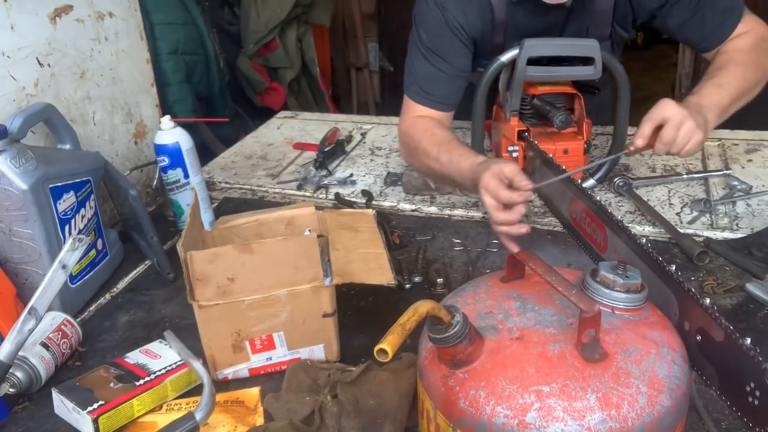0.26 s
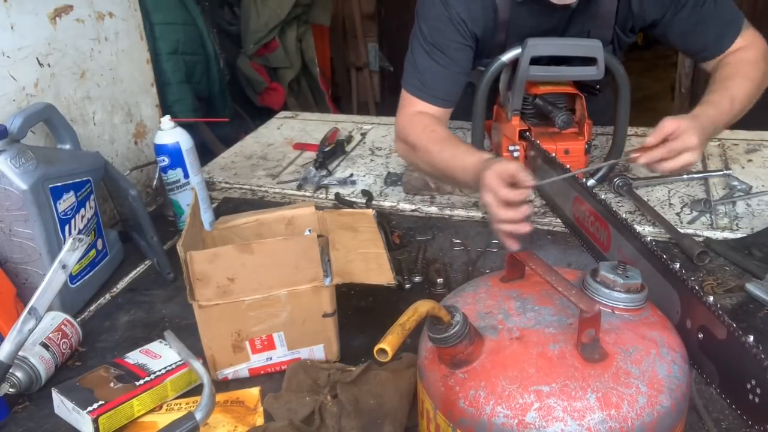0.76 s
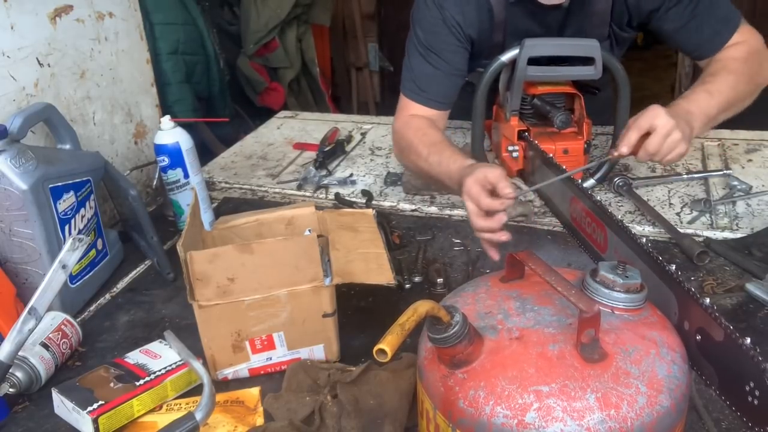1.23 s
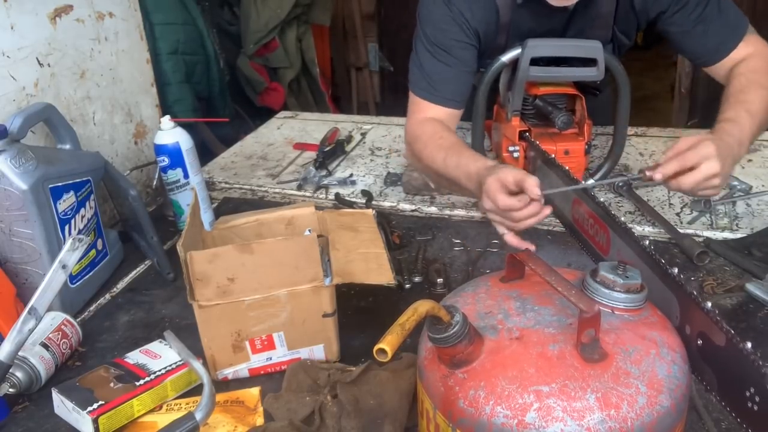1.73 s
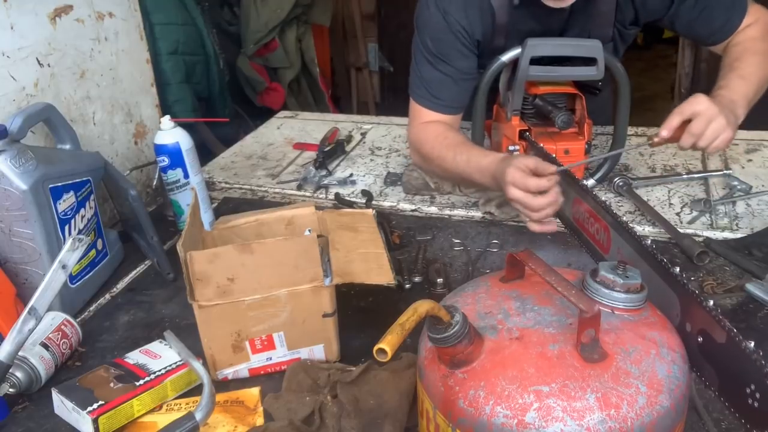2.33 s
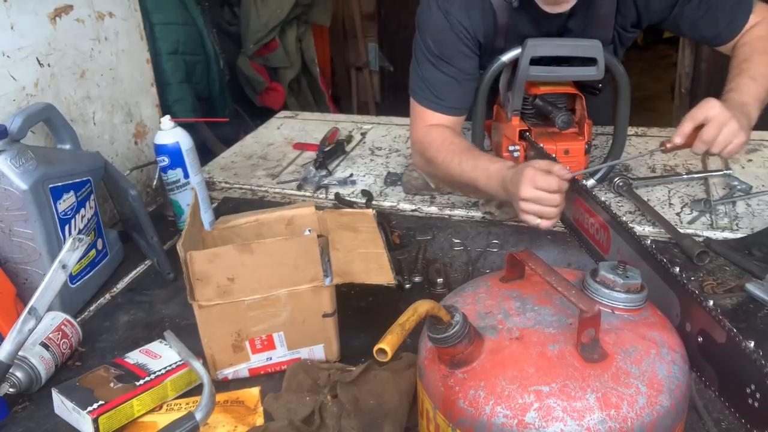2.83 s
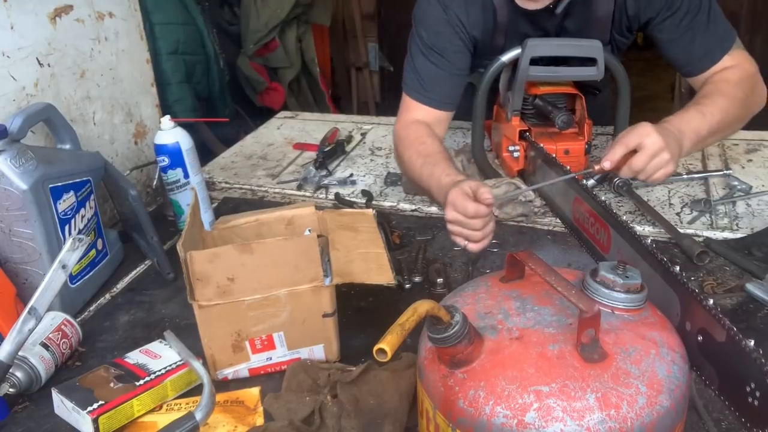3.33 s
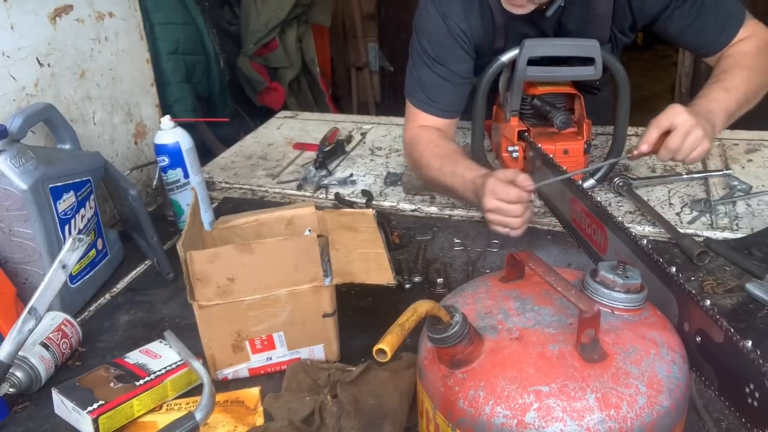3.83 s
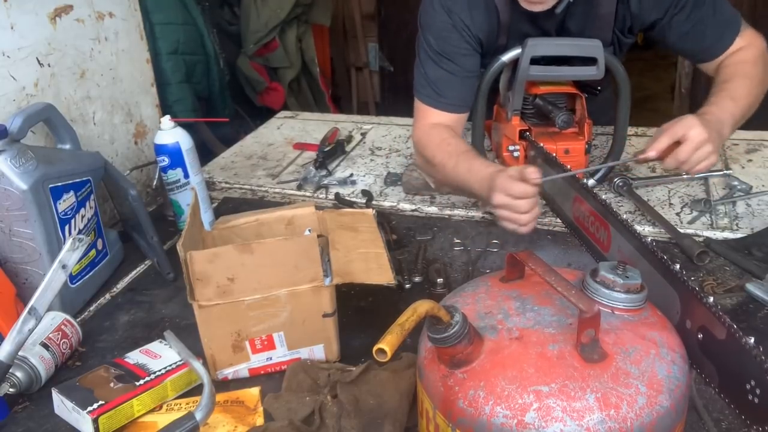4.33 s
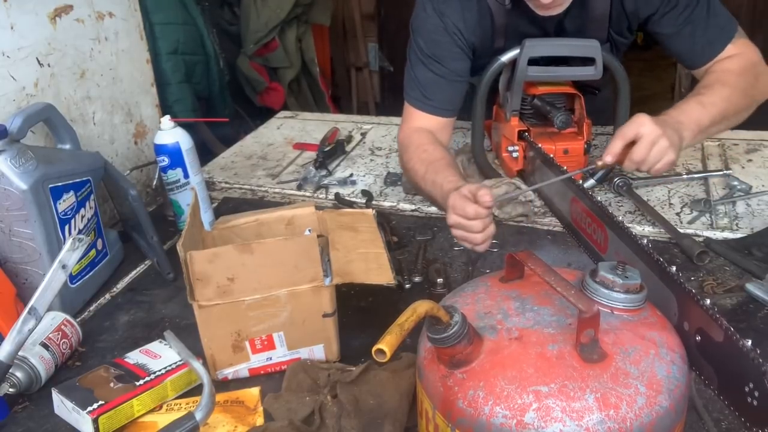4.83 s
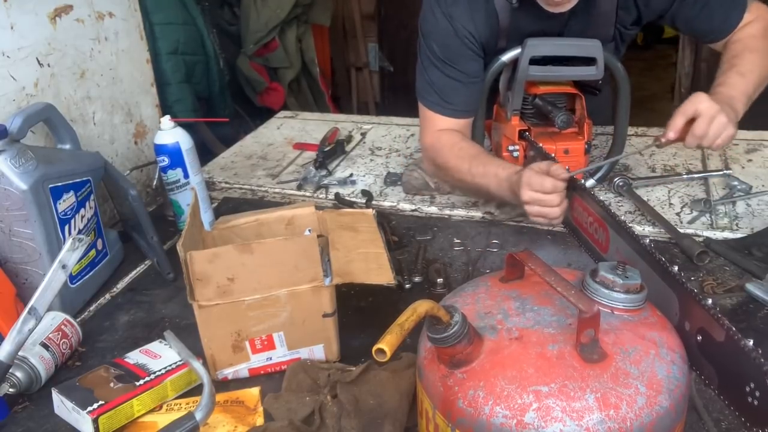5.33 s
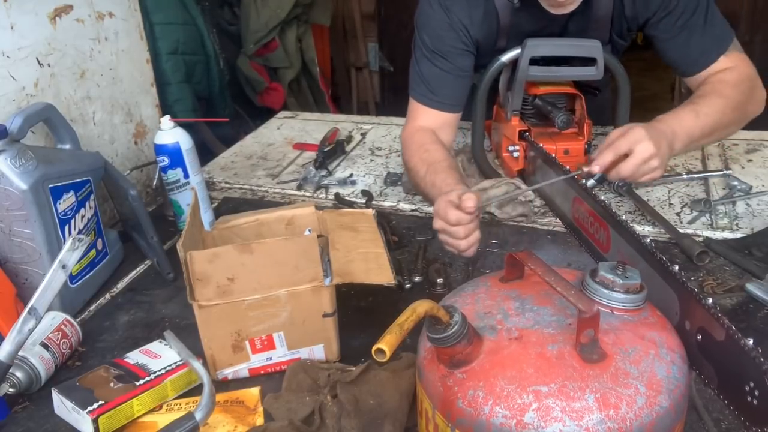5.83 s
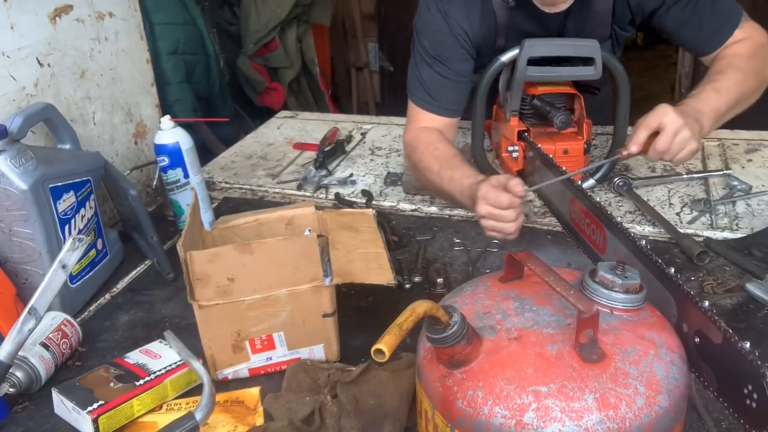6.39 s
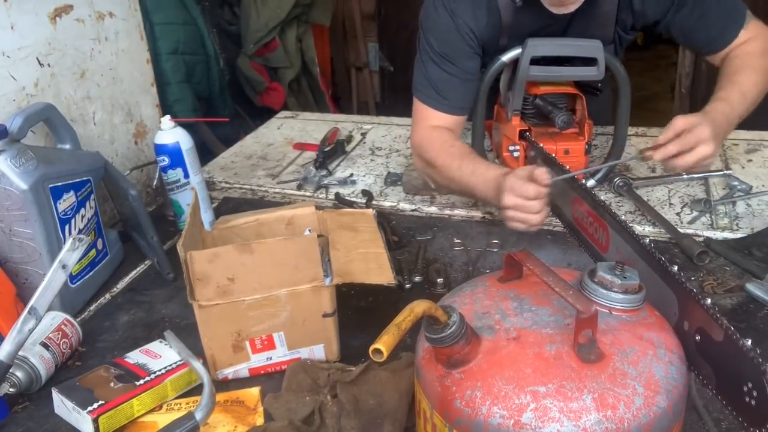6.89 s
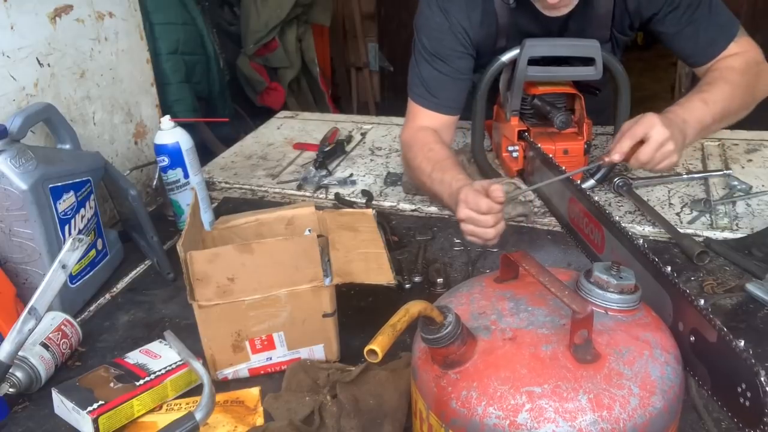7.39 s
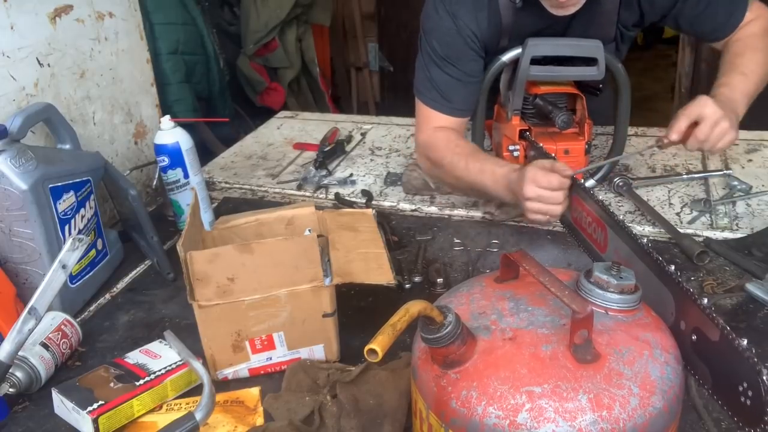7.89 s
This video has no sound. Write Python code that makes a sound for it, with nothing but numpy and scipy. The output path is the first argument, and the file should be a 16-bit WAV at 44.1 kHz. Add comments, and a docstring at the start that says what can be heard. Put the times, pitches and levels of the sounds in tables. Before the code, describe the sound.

A close, fairly dry stereo view of hand filing on a chainsaw chain, slightly right of centre in a small cluttered workshop. Coarse, bright metallic pushes with a low juddering buzz start at 0.05 and 0.9 s, each lasting nearly half a second, with a lighter zipping return at 0.63 s. At about 1.65-1.7 s the file clicks sharply off the cutter with a dull bench knock, brushes lightly, then clicks twice at 2.1 s. After a short scrape and a drawback at 2.55 s, steady pushes follow at 2.8, 3.6, 4.4, 5.2, 6.1, 7.0 and 7.85 s. Thin ringing returns fall between them, with small chirps and squeals, most noticeable near 3.3 s. A single click comes at 4.3 s and a soft low thud at 7.5 s. Faint rumbling air lies beneath; a weak wavering low hum enters around 3.5 s and remains. The last push runs to the end.

```python
"""In a workshop, a round file sharpens the cutters of a chainsaw lying on a bench.
Each push bites: tooth impacts and chip fractures excite the modes of the steel, and friction makes the bar judder.
The file is drawn back lightly, zipping and ringing; snags squeal, and teeth catching in step chirp.
Once it is lifted to the next cutter and set down with clicks, while the saw's body knocks dully on the bench.
Behind lie the room's reflections and still air with a faint rumble; a low wavering hum comes in later."""
import sys
import numpy as np
from scipy import signal
from scipy.fft import rfft, irfft, next_fast_len
from scipy.io import wavfile
from scipy.ndimage import uniform_filter1d

SR = 44100
rng = np.random.default_rng(int(sys.argv[2]) if len(sys.argv) > 2 else 0)


def dump_mix(stems):
    """Bounce the given channels to the path in sys.argv[1] as a 16-bit WAV at rate SR."""
    frames = np.atleast_2d(stems).T  # one column per channel
    limited = np.clip(frames, -1, 1)  # hard clip at full scale
    pcm = np.round(limited * 32767).astype(np.int16)
    wavfile.write(sys.argv[1], SR, pcm)


N = 359415
TIME = np.arange(N) / SR  # s
BINS = np.fft.rfftfreq(8192, 1 / SR)  # Hz

# modes of chain and bar: nominal [f/Hz, width/Hz, lift/dB]
SAW_MODES = [(407, 18, 8.5), (520.7, 40, 9.5), (657, 31, 15.5), (865, 107, 11.5), (3530, 90, -1.5),
             (1411, 270, 7.5), (5810, 84, 4.5), (1857, 94, 4.5), (2413, 83, 7.5), (2620, 118, 8.5),
             (2854, 130, 7), (3036, 190, 7.5), (3207, 171, 9), (3432, 150, 7), (4188, 304, 11)]
# modes of the loosely held file: nominal [f/Hz, width/Hz, lift/dB]
FILE_MODES = [(1593, 380, 6), (4470, 140, 4.8), (5405, 810, 9.4), (6360, 67, 11.4), (11800, 260, 9.5),
              (14700, 700, 12.5)]
# broad colour of the sliding contact: [f/Hz, relative level/dB]
SLIDE_COLOUR = [(60, -22.5), (300, -4), (500, -12), (1200, -8.5), (1600, -8), (3200, -11), (3800, -5.5),
                (6000, -6.5), (7300, -9), (11500, -13), (15500, -23)]
# the sliding file snags, rasps louder and squeals: [middle t/s, half length/s, lift/dB, squeal f/Hz]
SNAGS = [(0.677, 0.029, 3.5, 5500), (1.852, 0.011, 3, 4300), (3.329, .018, 6, 5484),
         (3.359, 0.0069, 6.5, 4220), (3.446, 0.013, 3.5, 5400), (4.342, 0.021, 6, 2793),
         (5.947, 0.024, 2.5, 5600), (6.781, .02, 2, 4330), (7.689, .025, 2.5, 4246)]

# the hand: time to make contact, to brake, and to travel on after lifting (s)
TOUCH_S, BRAKE_S, RUN_ON_S = 0.0072, 0.075, 0.052


def amp(db):
    """Decibels to amplitude ratio: 20 dB per factor of ten."""
    return np.exp(np.asarray(db) * (np.log(10) / 20))


def unit(x):
    """Normalises a signal to rms 1, its effective value."""
    return x / np.sqrt(np.mean(x ** 2) + 1e-20)


def read(points, hz):
    """Interpolates a table on a logarithmic frequency axis, as spectra are plotted."""
    f, value = np.transpose(points)
    return np.interp(np.log(hz + 1), np.log(f + 1), value)


def wobble(hz):
    """Gaussian low-pass noise of rms 1: random fluctuation mostly slower than hz."""
    size = next_fast_len(N // 8 + 2)  # computed at an eighth of the sample rate
    lowpass = np.exp(-(np.fft.rfftfreq(size, 8 / SR) / hz) ** 2)
    slow = irfft(rfft(rng.standard_normal(size)) * lowpass, size)
    return unit(np.interp(np.arange(N) / 8, np.arange(size), slow))


def bump(s, half_s):
    """Gaussian envelope: a smooth swell around the time s."""
    return np.exp(-np.minimum(((TIME - s) / half_s) ** 2, 20))


def causal(gain):
    """Minimum-phase spectrum: the Hilbert transform of log gain gives a response that rings after the blow."""
    log_gain = np.log(np.r_[gain, gain[-2:0:-1]] + 1e-6)
    return np.exp(np.conj(signal.hilbert(log_gain)))[:len(gain)]


def ports(mid, side):
    """Interaural phase: a quadrature side part makes the right channel lead the left."""
    turn = 1j * side / mid
    delay = np.exp(-2j * np.pi * BINS * 32 / SR)
    return irfft(causal(mid) * np.array([1 - turn, 1 + turn]) * delay)[:, :4096]


def through(x, response):
    """Convolution: a linear system answers each sample of x with its left and right impulse responses."""
    return signal.oaconvolve(np.atleast_2d(x), response, axes=1)[:, :N]


def pushes(rasp_db=-0.5, tooth_share=0.62, grab_db=0.87, uneven_db=0.82, settle_s=0.053, brush_judder_db=-6):
    """Stick-slip cutting: the bar's shaking modulates the force on the steel and settles after each stroke."""
    # forward strokes: [start t/s, length/s, rasp level/dB before rasp_db, leaning in/dB,
    # easing off by the end/dB, judder level/dB, where the judder peaks/share of length]
    push_rows = [(0.052, 0.44, -38, 10, 4.5, -32.5, 0.64), (0.91, 0.46, -38, 9.5, 4.5, -33, 0.96),
                 (2.791, 0.42, -34.5, 9.5, 13.5, -32.5, 0.74), (3.575, 0.46, -35.5, 14.5, 9, -32, 0.82),
                 (4.411, 0.42, -37, 4.5, 7, -32, 0.66), (5.241, 0.44, -36.5, 10, 4.5, -31, 0.66),
                 (6.096, 0.49, -36.5, 8, 11, -32, 0.81), (6.978, 0.48, -37.5, 6, 8.5, -33, 0.44),
                 (7.854, 0.39, -37.5, 9, 3, -34.5, 0.6)]
    # the file brushes the cutter while finding its seat: [start t/s, length/s, rasp level/dB before rasp_db]
    brush_rows = [(1.7, 0.19, -43), (1.94, 0.012, -55), (2.215, 0.025, -51.5), (3.286, 0.017, -44),
                  (5.804, 0.042, -51.5), (5.853, 0.028, -44), (6.699, 0.024, -47)]
    # the bar lurches as the file grabs: [t/s, lift/dB]
    lurch_rows = [(.11, 5.5), (1.31, 4.5), (3.98, 4), (4.69, 5), (6.61, 3)]
    # broad colour of the biting contact: [f/Hz, relative level/dB]
    bite_colour = [(150, -24.5), (300, -0.5), (500, -10), (1200, -7.5), (1600, -4), (3200, -8), (6000, -5),
                   (7300, -10), (11500, -14.5), (15500, -17.5)]
    bite_peak_share, lift_db_per_s = 0.38, 274.5
    judder_build_db, judder_ease_db = 11.5, 12.5

    shake, bite = judder(), sliding(brush_rows)
    drive = amp(brush_judder_db) * bite
    for start, length, db, lean_db, ease_db, bar_db, bar_peak in push_rows:
        # the bite is hardest early, the judder builds up later
        bite = bite + stroke(start, length, db, lean_db, bite_peak_share, ease_db, lift_db_per_s)
        drive = drive + stroke(start, length, bar_db, judder_build_db, bar_peak, judder_ease_db, lift_db_per_s)

    cut = tooth_share * teeth(push_rows, top_hz=1196, speed_up_s=0.04, jitter=0.08)
    cut = cut + chips(per_s=6000, spread_db=2.5)
    pressure = amp(grab_db * shake.mean(0) + uneven_db * wobble(37))
    force = unit(cut * pressure) * bite

    # the swing follows its drive at once and dies away exponentially
    fade = np.exp(-1 / (settle_s * SR))
    swing = np.maximum(drive, signal.lfilter([1 - fade], [1, -fade], drive))
    lurch = amp(sum(db * bump(s, half_s=0.025) for s, db in lurch_rows))
    return amp(rasp_db) * rubbed(force, bite_colour, SAW_MODES) + shake * swing * lurch


def judder(grip_detune=0.035):
    """Friction-driven resonance: close low modes of the saw beat together and wander with the grip."""
    # low modes of the saw on the bench: nominal [f/Hz, half width/Hz, relative level/dB]
    low_modes = [(49, 10, -14.5), (100, 16, -0.5), (125.6, 8.7, 4), (195, 10.2, -2.5), (217.5, 12.6, -3.5),
                 (276, 44, -23)]
    body = np.sqrt(sum((amp(db) / (1 + ((BINS - hz) / width) ** 2)) ** 2 for hz, width, db in low_modes))
    spread = amp(read([(100, -58), (210, -13.0), (330, 8.0)], BINS))  # side over mid, against Hz
    shake = through(rng.standard_normal(N), ports(body, body * spread))
    drift = np.cumsum(grip_detune * wobble(8.0)) / SR  # s
    shake = np.array([np.interp((TIME + drift) % TIME[-1], TIME, channel) for channel in shake])
    # the hands damp large swings, so the shaking keeps a steady size
    return shake / np.sqrt(uniform_filter1d(shake.mean(0) ** 2, size=4000))


def stroke(start, length, db, lean_db, peak_share, ease_db, lift_db_per_s):
    """Contact-force envelope: touch, an arch of pressure, then exponential decay as the file lifts."""
    gain, on = np.zeros(N), (TIME > start) & (TIME < start + length + .5)
    t = TIME[on] - start
    progress = np.clip(t / length, 0, 1)
    peak = np.clip(peak_share, .05, .95)
    lean_in = lean_db * (1 - progress / peak) ** 2
    ease_off = ease_db * ((progress - peak) / (1 - peak)) ** 2
    arch_db = np.where(progress < peak, lean_in, ease_off)
    lift_db = lift_db_per_s * np.maximum(t - length, 0)
    gain[on] = np.clip(t / TOUCH_S, 0, 1) * amp(db - arch_db - lift_db)
    return gain


def sliding(rows):
    """Light sliding friction: nearly level strokes, raised wherever the file snags."""
    # the file skates on at once and is lifted off quickly
    skate = dict(lean_db=4, peak_share=0.2, ease_db=2.5, lift_db_per_s=415)
    gain = sum(stroke(*row, **skate) for row in rows)
    for s, half_s, db, _ in SNAGS:
        near = slice(*np.searchsorted(TIME, [s - .5, s + .5]))
        gain[near] *= amp(db * np.exp(-((TIME[near] - s) / half_s) ** 2))
    return gain


def teeth(strokes, top_hz, speed_up_s, jitter):
    """Periodic impacts: one tick per file tooth, at a rate set by the hand's speed."""
    rate = np.zeros(N)
    for start, length, *_ in strokes:
        end = start + length + RUN_ON_S
        on = (TIME > start) & (TIME < end)
        speed_up = np.tanh((TIME[on] - start) / speed_up_s)
        rate[on] += top_hz * speed_up * np.tanh((end - TIME[on]) / BRAKE_S)
    passed = np.cumsum(rate * (1 + jitter * wobble(300) + .04 * wobble(25))) / SR  # teeth so far
    size = amp(6.7 * np.minimum(rng.standard_normal(N), 1.5))
    ticks = np.diff(np.floor(passed), prepend=0) * size
    ticks -= uniform_filter1d(ticks, size=150)  # removes the steady push
    return ticks / ticks[rate > 1].std()


def chips(per_s, spread_db):
    """Shot noise: random tiny fractures of many sizes as steel is torn off."""
    size = amp(spread_db * np.minimum(rng.exponential(1, N), 4))
    return unit(size * rng.choice([-1, 1], N) * (rng.random(N) < per_s / SR))


def rubbed(force, colour, modes, count=3):
    """Position-dependent modal excitation: pitch and strength shift as the contact travels along the file."""
    detune_share, vary_share = 0.006, 0.22
    place, out = count * wobble(2.95), 0
    for k in range(count):
        detune, lift = rng.standard_normal((len(modes), 2)).T
        factors = [1 + detune_share * detune, np.ones(len(modes)), 1 + vary_share * lift]
        moved = np.array(modes) * np.transpose(factors)
        nearness = np.maximum(1 - abs((place - k) % count - count / 2), 0)
        out = out + through(force * nearness, steel(colour, moved))
    return out


def steel(colour, modes):
    """Modal resonance: a broad colour lifted at each mode, normalised by its mid power from 1 to 7 kHz."""
    # difference between the two microphone ports over their sum: [f/Hz, level/dB]
    port_spread = [(100, -25), (500, 1), (6800, -0.5), (8300, 21.5), (9800, 42), (10700, 0.5), (12000, -9)]
    hz, width, lift_db = np.transpose(modes)
    bumps = 1 / (1 + (2 * (BINS - hz[:, None]) / width[:, None]) ** 2)
    spread = amp(read(port_spread, BINS))
    mid = amp(read(colour, BINS) + lift_db @ bumps) / np.hypot(1, spread)
    band = (BINS > 1000) * (BINS < 7000)
    return ports(mid, mid * spread) / np.sqrt(np.mean(mid ** 2 * band))


def returns(tooth_share=0.34, chip_share=0.89, skip_db=2.5, judder_db=-13):
    """Impact excitation without cutting: drawn back lightly, the file skips over its teeth and rings."""
    # return strokes: [start t/s, length/s, rasp level/dB]
    return_rows = [(0.628, 0.22, -40.5), (2.116, 0.075, -38), (2.565, 0.17, -40), (3.296, 0.22, -38),
                   (4.246, 0.12, -38.5), (5.026, 0.16, -40), (5.919, .127, -38), (6.744, 0.18, -38.5),
                   (7.57, 0.23, -40)]
    zipping = teeth(return_rows, top_hz=1754, speed_up_s=0.025, jitter=.05)
    slide = tooth_share * zipping + chip_share * chips(per_s=6000, spread_db=2.0)
    gain = sliding(return_rows)
    force = slide * unit(amp(skip_db * wobble(62))) * gain
    return rubbed(force, SLIDE_COLOUR, SAW_MODES + FILE_MODES) + amp(judder_db) * judder() * gain


def squeals(squeal_db=-41, width_hz=170):
    """Friction-induced vibration: at each snag one mode of the file flares up, blurred by random phase."""
    slip, tone = wobble(width_hz), 0
    for s, half_s, db, hz in SNAGS:
        tone = tone + amp(squeal_db + db) * bump(s, half_s) * np.sin(2 * np.pi * hz * TIME + slip)
    return through(tone, ports(*np.ones((2, len(BINS)))))


def zips(zip_db=1, overtone_db=-9, bend=1.1):
    """Tooth-passing frequency: teeth catching in step sing a harmonic glide that follows the hand's speed."""
    # chirps, mostly as the hand speeds up or brakes:
    # [start t/s, length/s, from f/Hz, to f/Hz, level/dB before zip_db and the steel]
    chirp_rows = [(0.818, 0.041, 1580, 1033, -50.5), (1.646, .014, 1645, 1454, -45.5),
                  (2.152, 0.041, 1350, 960, -48), (2.859, 0.038, 830, 881, -38),
                  (2.906, 0.048, 1800, 2158, -40), (3.309, 0.051, 600, 1505, -44.5),
                  (3.483, 0.047, 1620, 1083, -44.5), (5.031, 0.022, 1450, 1610, -44),
                  (5.169, 0.03, 1400, 821.6, -45), (6.006, 0.054, 1650, 920, -46),
                  (6.762, .034, 1380, 1600, -40), (6.879, 0.039, 1620, 1072, -47),
                  (7.63, 0.052, 1600, 834, -48), (7.767, 0.049, 1600, 973, -45.5)]
    rate, gain = np.zeros((2, N))
    for start, length, from_hz, to_hz, db in chirp_rows:
        on = (TIME > start) & (TIME < start + length)
        progress = (TIME[on] - start) / length
        rate[on] = from_hz + (to_hz - from_hz) * progress ** bend
        gain[on] = amp(db) * np.sqrt(np.sin(np.pi * progress))
    passed = np.cumsum(rate * (1 + 0.028 * wobble(380))) / SR  # teeth so far
    tone = sum(amp(overtone_db * k) * np.cos(2 * np.pi * (k + 1) * passed) for k in range(3))
    contact = unit(amp(1.8 * wobble(150)))
    force = np.sqrt(2) * tone * contact * gain
    return amp(zip_db) * through(force, steel(SLIDE_COLOUR, FILE_MODES[1:]))


def clicks(rattle=0.14, rattle_s=0.012):
    """Impulsive excitation: a sharp knock of file on cutter, then a brief rattle of the loose links."""
    # the file knocks against the chain: [t/s, peak level/dB]
    knock_rows = [(1.644, -30.5), (1.677, -31.5), (1.691, -20), (2.086, -25), (2.116, -23), (4.322, -21)]
    response, out = steel(SLIDE_COLOUR, SAW_MODES + FILE_MODES), np.zeros((2, N))
    t = TIME[:2048]
    for s, db in knock_rows:
        decay = np.exp(-t / 0.0013) + rattle * np.exp(-t / rattle_s)
        force = rng.standard_normal(len(t)) * decay * (1 - np.exp(-t / 0.0023))
        knock = through(force, response)
        start = round(s * SR) - 32  # makes up for the delay in ports()
        out[:, start:start + knock.shape[1]] += amp(db) * knock / abs(knock.mean(0)).max()
    return out


def thud():
    """Damped oscillation: dull knocks of the saw's body on the bench."""
    # the saw rocks on the bench: [t/s, f/Hz, level/dB before the envelope, decay/s]
    rock_rows = [(1.657, 108, -38, .025), (2.088, 229, -38.5, 0.026), (2.118, 129, -38, 0.03),
                 (7.519, 60.05, -33, 0.074)]
    out = np.zeros(N)
    for s, hz, db, decay_s in rock_rows:
        t = np.maximum(TIME - s, 0)
        envelope = np.exp(-t / decay_s) * (1 - np.exp(-2 * hz * t))
        out += amp(db) * np.sin(2 * np.pi * hz * t) * envelope
    return out


def ringing(x):
    """Free decay: clusters of close modes in bar and chain sing on faintly when the file lifts."""
    # modes that ring on after a push: [f/Hz, width/Hz, relative level/dB]
    ring_modes = [(405, 16, -3), (1603, 100, -5)]
    t, ring = TIME[:SR // 2], 0
    for hz, width, db in ring_modes:
        band = signal.butter(2, [hz - width / 2, hz + width / 2], "band", fs=SR, output="sos")
        decay = amp(-60 * t / .7)  # 60 dB in 0.7 s
        cluster = signal.sosfilt(band, rng.standard_normal((2, len(t)))) * decay
        ring = ring + amp(db) * cluster / np.linalg.norm(cluster[0]) * np.sqrt(2 * width / SR)
    return through(x, ring)


def shifting(x, ring_s=0.013, drift_hz=5):
    """Moving-source interference: the fine pattern of a short ringing shifts as the contact travels."""
    t = TIME[:SR // 10]
    cross = np.array([[1, 1], [1, -1.0]]) / np.sqrt(2)  # left and right to mid and side, and back
    place, out = 2 * wobble(drift_hz), 0
    for weight in (np.cos(place), np.sin(place)):
        ring = rng.standard_normal((2, len(t))) * np.exp(-t / ring_s)
        out = out + through(weight * (cross @ x), ring / np.linalg.norm(ring[0]))
    return cross @ out


def room(x):
    """Diffuse reverberation: dense reflections of a cluttered workshop, the treble dying first."""
    # reverberation time: [f/Hz, t60/s]
    t60 = [(100, 0.12), (1000, 0.44), (4000, 0.14), (14000, 0.1)]
    hz, t, z = signal.stft(rng.standard_normal((2, SR // 2)), SR, nperseg=256)
    decay = amp(-60 * t / read(t60, hz)[:, None])
    tail = signal.istft(z * decay, SR, nperseg=256)[1]
    tail[:, :150] = 0  # gap before the first reflection
    return through(x, tail / np.linalg.norm(tail[0]))


def background(air_db=-58, apart=0.44):
    """Coloured noise and a quasi-steady tone: still air with a faint rumble, and a low wavering hum."""
    # spectrum of the still air: [f/Hz, relative level/dB]
    air_colour = [(18, -30.5), (32, -4), (70, 5), (200, -15.5), (1000, -26), (2500, -34), (7500, -49)]
    # a low hum rises to a nearly steady pitch: [t/s, mean f/Hz, mean level/dB]
    hum_path = [(3.2, 65.8, -75), (3.55, 76.1, -42.5), (4.2, 95, -53), (4.95, 102.8, -53),
                (5.7, 109.4, -44), (6.9, 108.6, -42), (8.15, 107.9, -45)]
    colour = amp(read(air_colour, np.fft.rfftfreq(N, 1 / SR)))
    noise = irfft(rfft(rng.standard_normal((2, N))) * colour, N)
    air = amp(air_db) * (unit(noise[0]) + apart * np.outer([1, -1], unit(noise[1])))
    s, hz, db = np.transpose(hum_path)
    phase = 2 * np.pi * np.cumsum(np.interp(TIME, s, hz) * (1 + 0.01 * wobble(1.7))) / SR
    return air + amp(np.interp(TIME, s, db) + wobble(6.5)) * np.sin(phase)


def scene(direct_db=-2.0, shift_db=-5, room_db=-14, left_db=-1.92, right_db=0.72):
    """Superposition: the filing, a little to the right, in its room."""
    biting = pushes()
    filing = biting + returns() + clicks()
    highpass = signal.butter(2, 400, "high", fs=SR, output="sos")
    bright = signal.sosfilt(highpass, filing + 1e-20)
    near = amp(direct_db) * filing + amp(shift_db) * shifting(bright)
    near = near + ringing(biting) + zips() + squeals()
    # the right port is nearer, which favours it below the top treble
    body = signal.sosfiltfilt(signal.butter(4, 6000, fs=SR, output="sos"), near)
    near = near + body * (amp([[left_db], [right_db]]) - 1)
    return near + amp(room_db) * room(body) + thud() + background()


def record(dry):
    """Band limitation: a linear-phase low-pass removes the top treble."""
    edge_hz = 15900
    lowpass = signal.firwin(511, edge_hz, window=("kaiser", 9), fs=SR)
    return signal.oaconvolve(dry, lowpass[None], "same")


dry = scene()
out = record(dry)
dump_mix(out)
```